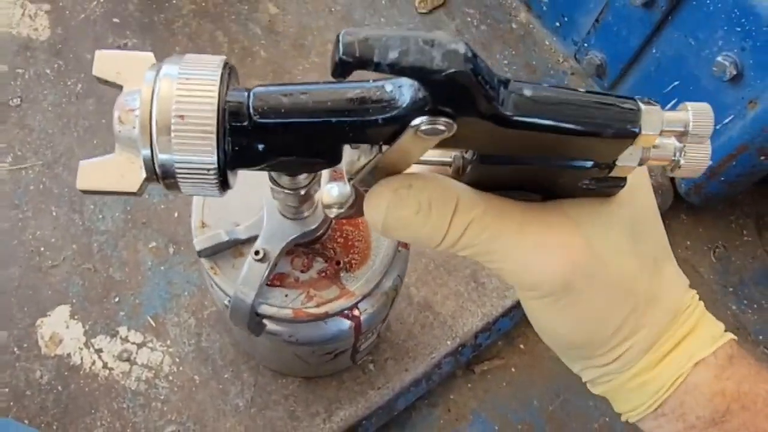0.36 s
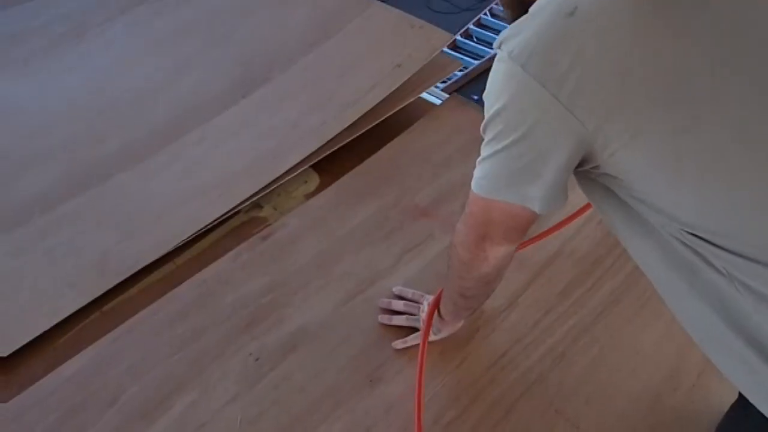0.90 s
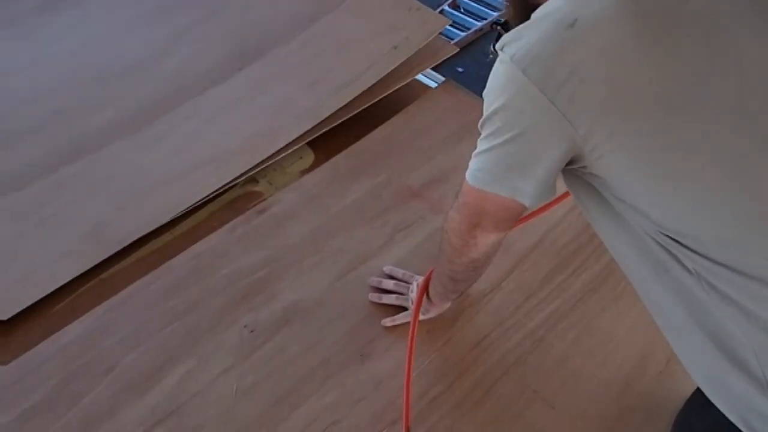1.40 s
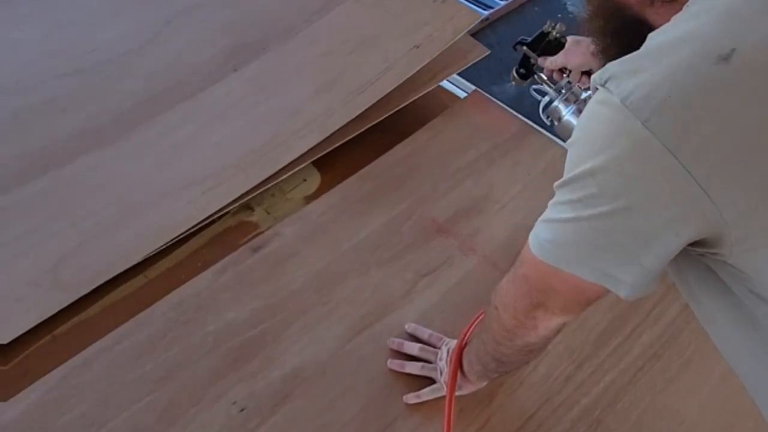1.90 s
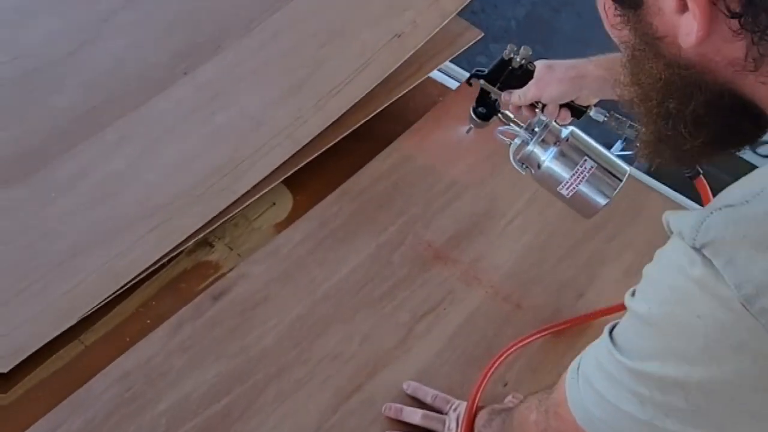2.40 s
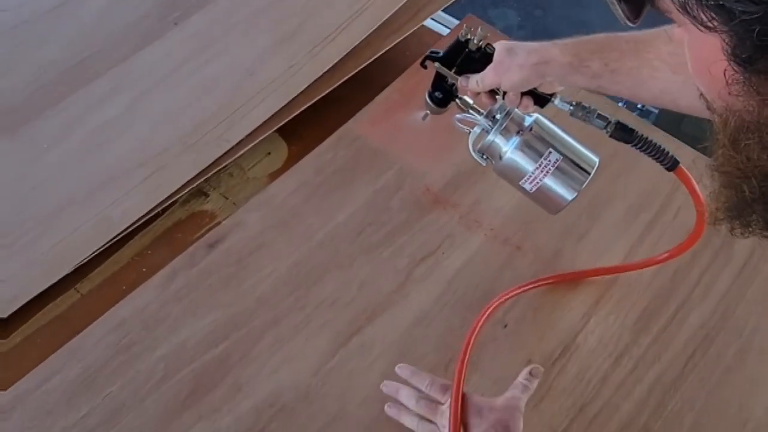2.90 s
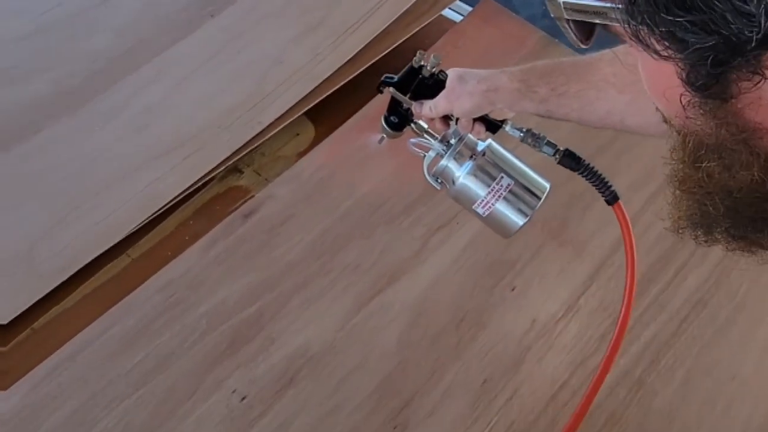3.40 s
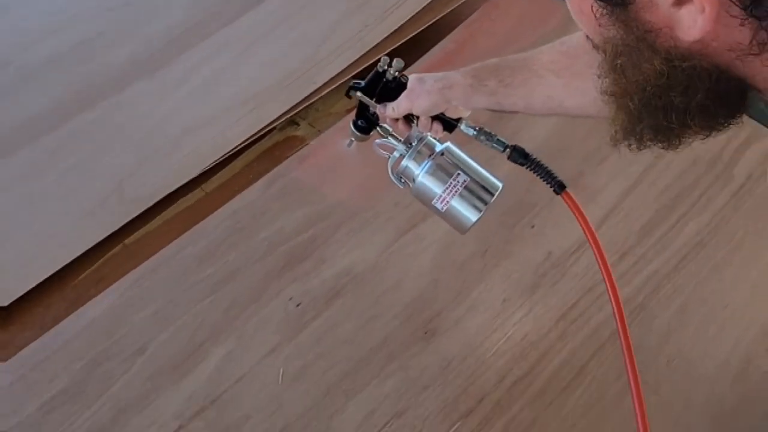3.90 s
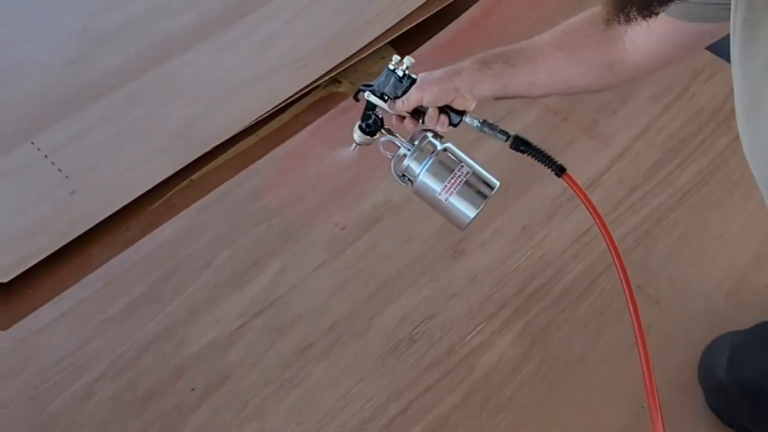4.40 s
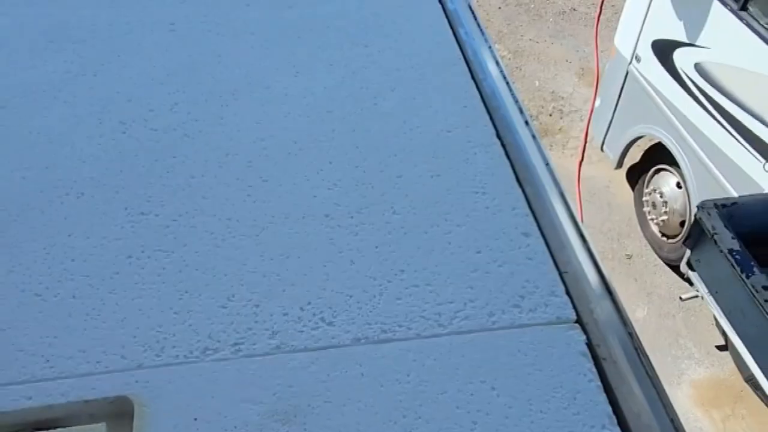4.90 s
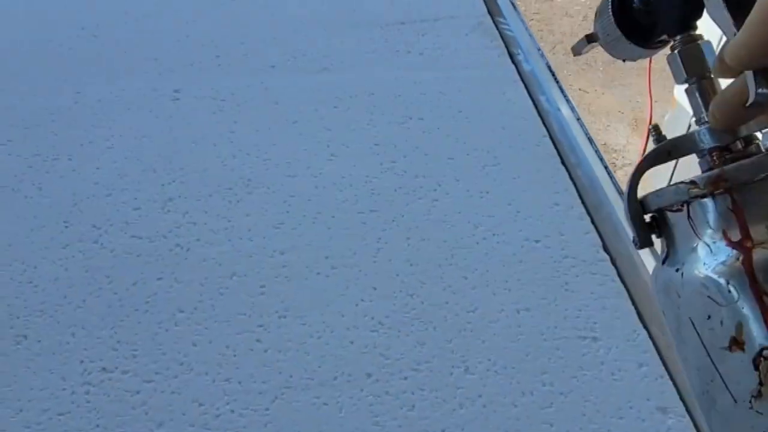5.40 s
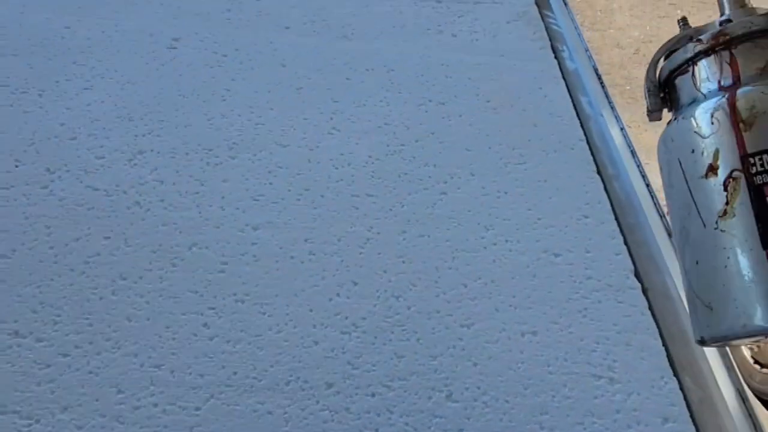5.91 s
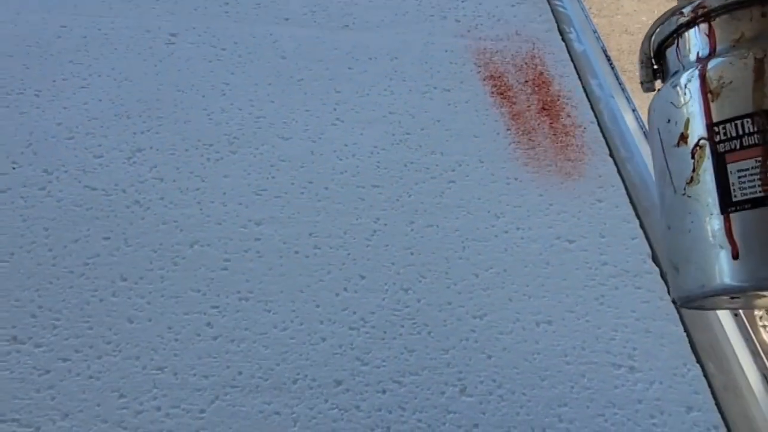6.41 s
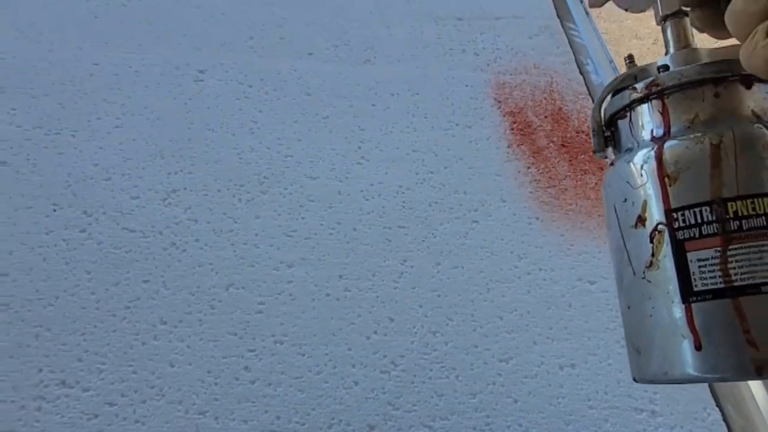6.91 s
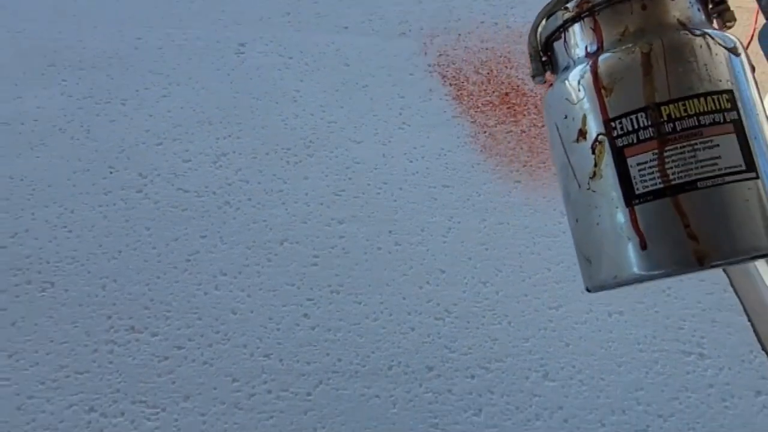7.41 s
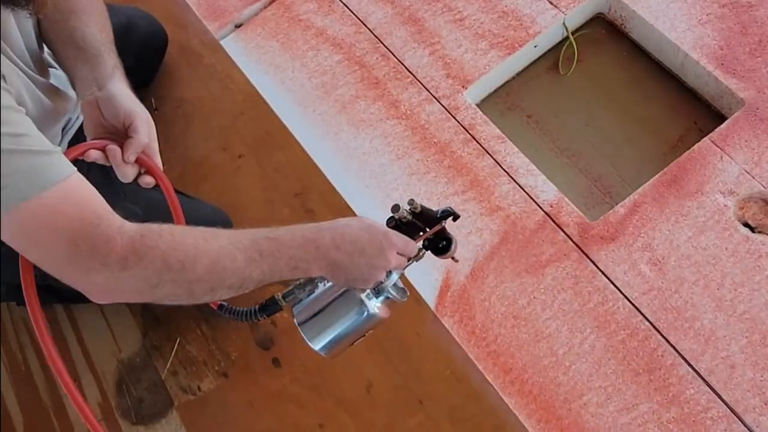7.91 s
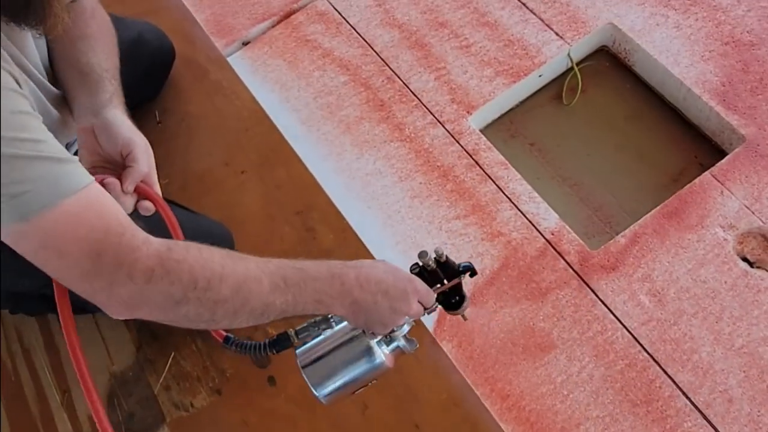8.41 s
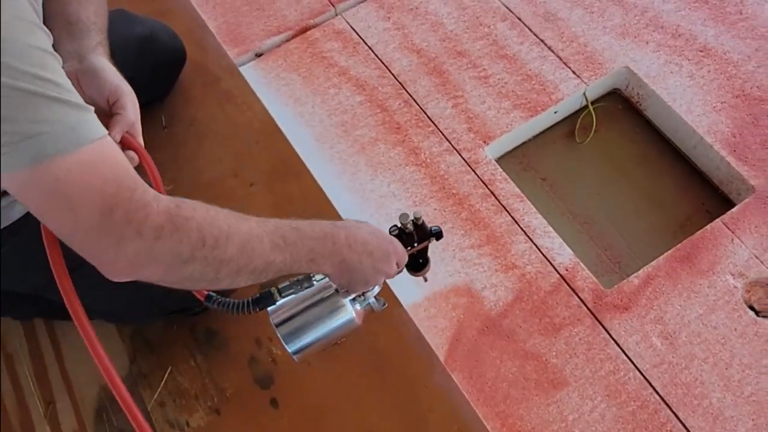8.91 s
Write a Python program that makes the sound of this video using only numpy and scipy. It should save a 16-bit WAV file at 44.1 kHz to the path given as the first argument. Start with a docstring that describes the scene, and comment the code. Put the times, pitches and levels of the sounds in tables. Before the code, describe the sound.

A spray gun is fiddled with, then blasts steady fizzing air in three close scenes, with faint compressor hum and finally a distant revving engine.

```python
"""A compressed-air spray gun: its jet fizzes at the air cap, then hisses and roars on the panel it hits.
Four short scenes: handling the gun close by, then blowing on plywood, on a roof, where glue joins the air,
and on foam. Two silent gaps part the first three; the last two melt into each other.
The jet is noise in narrow bands that swell and flicker; finger touches are noise bursts through resonances.
Sine waves make the humming compressor and a far-off engine that revs."""
import sys
import numpy as np
from scipy import signal
from scipy.fft import rfft, irfft, next_fast_len
from scipy.io import wavfile
from scipy.ndimage import uniform_filter1d

SR = 44100
rng = np.random.default_rng(int(sys.argv[2]) if len(sys.argv) > 2 else 0)


def volts_from_decibels(level):
    """Turn decibel levels (scalar or array-like) into linear amplitude factors."""
    exponent = np.asarray(level, float) / 20
    return 10 ** exponent


def put_to_file(sound):
    """Save the sound as 16-bit audio at rate SR, in the file named by the first command-line argument."""
    columns = np.atleast_2d(sound).T  # one column per channel
    safe = np.clip(columns, -1, 1)
    whole_steps = np.round(safe * 32767)
    wavfile.write(sys.argv[1], SR, whole_steps.astype(np.int16))


N = 399105
T = np.arange(N) / SR
STEP = 128  # samples between two points of a slow level curve


def walk(rate, count):
    """Slow random wander, spread near 1: random levels held 1 / rate samples and smoothed twice."""
    hold = max(int(1 / rate), 1)
    held = np.repeat(rng.standard_normal(count // hold + 1), hold)
    return 1.125 * uniform_filter1d(uniform_filter1d(held, hold), hold)[:count]


def spectrum(table, hz):
    """Read a table of (f/Hz, level/dB) points along a log-frequency axis."""
    f, db = np.transpose(table)
    return np.interp(np.log(hz), np.log(f), db)


def ring(x, modes):
    """Let x excite resonances (f/Hz, width/Hz, level/dB), as a struck body does, and add them up."""
    return sum(volts_from_decibels(db) * signal.lfilter(*signal.iirpeak(hz, hz / width, fs=SR), x) for hz, width, db in modes)


def span(t, start, end, edge):
    """A plateau from 0 up to 1 and back, with sloping edges centred on the two times."""
    return np.clip(np.minimum(t - start, end - t) / edge + .5, 0, 1)


# when each scene is heard: (start t/s, end t/s, fade-in/s)
# the last fade-in is a crossfade centred on the last start, and the last scene runs to the end
SHOTS = [(0, .603, .001), (.906, 4.802, .018), (4.999, 7.62, .001), (7.62, 9.06, .2)]


def shot_gains(t):
    """Gain of each scene in time; the last two cross over at equal power."""
    gains = [np.clip((t - start) / fade, 0, 1) * np.clip((end - t) / 0.0023, 0, 1) for start, end, fade in SHOTS]
    start, _, fade = SHOTS[3]
    late = np.clip((t - start) / fade + .5, 0, 1)
    gains[2] = np.clip((t - SHOTS[2][0]) / SHOTS[2][2], 0, 1) * np.sqrt(1 - late)
    gains[3] = np.sqrt(late)
    return np.array(gains)


# how the engine revs: (t/s, base cycle f/Hz, level/dB)
ENGINE = [(7.6, 14.9, -48), (7.7, 16.5, -47.5), (7.85, 17.5, -43), (8.0, 18.1, -41), (8.15, 18, -38),
          (8.36, 18.3, -43.5), (8.6, 17.0, -45), (8.8, 19, -39.5), (9.04, 19.2, -40)]
# strength of its overtones: (multiple of the base cycle, level/dB relative to the engine level)
ORDERS_DB = [(3, -9), (4, 0), (5, 0), (7, -8), (9, -9), (10, -5)]


def engine():
    """Low multiples of an engine's cycle, each wavering in level while the engine revs up and down."""
    t, hz, db = np.transpose(ENGINE)
    phase = 2 * np.pi * np.cumsum(np.interp(T, t, hz)) / SR
    orders = sum(volts_from_decibels(rel_db + 2.2 * walk(6 / SR, N)) * np.sin(k * phase + k) for k, rel_db in ORDERS_DB)
    return np.sqrt(2) * volts_from_decibels(np.interp(T, t, db)) * orders


# hum tones: (multiple of the shaft speed, level/dB over plywood, level/dB on the roof), before the swell
COMPRESSOR = [(2, -57, -50), (3, -49, -55), (4, -53, -64), (6, -56, -50)]
# the hum swells and sinks: (t/s, change of level/dB)
HUM_SWELL = [(.9, -8), (2.5, -4), (3.5, 0), (4.8, 2), (5.0, -2), (5.4, 3), (5.85, 3), (5.95, -1), (6.6, 0),
             (7.6, -3)]
SHAFT_HZ = 28.82


def compressor(gains):
    """Hum at multiples of the shaft speed, wavering a little in pitch and level."""
    phase = 2 * np.pi * np.cumsum(SHAFT_HZ * (1 + 0.00355 * walk(2.5 / SR, N))) / SR
    swell_db = np.interp(T, *np.transpose(HUM_SWELL))
    hum = np.zeros(N)
    for k, plywood_db, roof_db in COMPRESSOR:
        level = volts_from_decibels(plywood_db) * gains[1] + volts_from_decibels(roof_db) * gains[2]
        wobble = volts_from_decibels(swell_db + 1.5 * walk(4 / SR, N))
        hum += level * wobble * np.sqrt(2) * np.sin(k * phase + k)
    return hum


# fingers on trigger and cup: (t/s, tick drive level/dB, knock drive level/dB, tick brightness 0-1)
TOUCHES = [(0.035, -42, -18, 0.3), (0.07, -21.5, -18.5, 0.5), (0.079, -14.5, -46, 0.43),
           (0.103, -17.5, -31, 0.45), (0.1336, -33, -10, 0.5), (0.1605, -27, -14.5, 0.4),
           (0.243, -32.5, -22.5, 0.2), (0.29, -36, -21.5, 0.5), (0.312, -36, -28.5, 0.63),
           (0.352, -39.5, -35, 0.46), (0.52, -43, -40.5, 0.5), (0.5785, -14, -26.5, 0.38)]
# resonances of the gun body: (f/Hz, width/Hz, level/dB)
GUN = [(70, 30, 3), (277, 45, 12.5), (350, 49, -9), (560, 86, -3), (737, 56, 0), (1200, 120, -25),
       (1370, 110, -24)]
# resonances of a tick: (f/Hz, width/Hz, level/dB when dull, level/dB when bright)
TICK = [(2200, 760, -7.5, -29), (4160, 1050, -12, 25.5), (8000, 4000, -43, -25.5),
        (13500, 4000, -19.5, -19)]
# faint tone of the cup: (start t/s, f/Hz, level/dB)
CUP_RING = (.33, 1162, -63)
TICK_S, KNOCK_S = 0.0034, 0.0095  # fading times of the noise bursts


def touches():
    """Each touch is a scratchy tick plus a dull knock through the gun body; the cup adds a faint steady tone."""
    out = np.zeros((2, N))
    t = T[:int(.12 * SR)]
    for at, tick_db, knock_db, bright in TOUCHES:
        burst = rng.standard_normal((3, len(t)))
        bright = np.clip(bright, 0, 1)
        modes = [(hz, width, dull_db + bright * (bright_db - dull_db)) for hz, width, dull_db, bright_db in TICK]
        scratch = np.diff(burst[:2], prepend=0) * np.exp(-t / TICK_S)  # differs left and right
        tick = ring(scratch, modes)
        knock = ring(burst[2] * np.exp(-t / KNOCK_S), GUN)
        i = int(at * SR)
        out[:, i:i + len(t)] += volts_from_decibels(tick_db) * tick + volts_from_decibels(knock_db) * knock
    start, hz, db = CUP_RING
    return out + volts_from_decibels(db) * np.clip((T - start) / .03, 0, 1) * np.sqrt(2) * np.sin(2 * np.pi * hz * T)


PUFF_S, PUFF_HZ = 1.196, (450, 3260)  # start, pass band
PUFF_DB, PUFF_SAG_DB_PER_S = -32, 110


def puff():
    """A short dull breath of air as the valve cracks open before the second pull: fading band-passed noise."""
    age = np.maximum(T - PUFF_S, 0)
    band = signal.butter(4, PUFF_HZ, "band", fs=SR, output="sos")
    mid, side = signal.sosfilt(band, rng.standard_normal((2, N)))
    shape = np.minimum(age / .006, 1) * volts_from_decibels(PUFF_DB - PUFF_SAG_DB_PER_S * age) / np.std(mid)
    return shape * np.array([mid + side, mid - side])


# slow level of the bass: (t/s, rumble level/dB, drumming level/dB)
RUMBLE = [(0.0, -47, -40), (0.166, -33, -35.5), (0.222, -41, -36), (0.3, -36, -35), (0.526, -46.5, -52),
          (0.6, -49.5, -52), (0.951, -55.5, -42.5), (1.06, -55, -54), (1.31, -47.5, -43), (1.9, -51.5, -49),
          (2.1, -41.5, -48), (4.79, -45, -45.5), (5.01, -43, -45.5), (5.86, -44.5, -47), (5.93, -50.5, -51),
          (7.3, -50, -48.5), (7.68, -48, -52.5), (8.08, -40, -42.5), (8.16, -42, -52), (8.3, -42, -50),
          (8.5, -38, -47.5), (9.04, -44, -45)]
# dull thuds, perhaps the hose or the breeze: (t/s, length/s, rumble level/dB, drumming level/dB)
THUDS = [(2.07, 0.092, -44, -58), (2.594, 0.088, -37, -60), (3.676, 0.063, -51, -36),
         (5.348, 0.11, -35.5, -66), (6.138, 0.018, -35, -42)]
GUST_DB, GUSTS_PER_S = 2, 11  # the bass flutters in the breeze
# the jet blows under a loose sheet, which drums: (start, end) in s, drumming dB, extra roar dB
SHEET_S, SHEET_DB, SHEET_ROAR_DB = (1.236, 1.9), -41.5, 5.5


def bass_levels(t):
    """Rumble and drumming in dB: a slow level that flutters, with thuds and the drumming sheet added as power."""
    s, *rows = np.transpose(RUMBLE)
    flutter = [np.interp(t, s, db) + GUST_DB * walk(GUSTS_PER_S * STEP / SR, len(t)) for db in rows]
    power = volts_from_decibels(2 * np.array(flutter))
    for at, length, rumble_db, drum_db in THUDS:
        bump = np.exp(-(2 * (t - at) / length) ** 2)
        power = power + np.outer(volts_from_decibels(2 * np.array([rumble_db, drum_db])), bump)
    sheet = volts_from_decibels(2 * SHEET_DB) * span(t, *SHEET_S, 0.072) ** 2
    return 10 * np.log10(power + np.outer([0, 1], sheet))


# the jet as the gun moves: (t/s, hiss on the panel level/dB, air cap level/dB)
JET = [(1.321, -30, -20.5), (1.66, -32.5, -21.5), (1.92, -27.5, -24), (2.23, -26.5, -22), (2.72, -27, -21),
       (3.3, -27.5, -22), (3.46, -28.5, -23), (4.1, -28, -22.5), (4.55, -26.5, -23), (4.79, -26, -20.5),
       (5.0, -24.5, -27.5), (5.5, -24.5, -26), (5.9, -25, -26.5), (6.75, -22.5, -25.5), (7.06, -23, -22),
       (7.22, -22, -22.5), (7.5, -23, -25), (7.75, -25, -26), (7.93, -21.5, -23), (8.08, -20, -23.5),
       (8.4, -22.5, -22), (8.519, -21.5, -24), (9.04, -19.5, -22)]
# rows plywood, roof, foam: (roar minus panel hiss/dB, fan air minus cap/dB, fizz minus cap/dB)
JET_PARTS = [(-12, -6.5, -2), (-17, -7, -1.5), (-18.5, -7.5, -3.7)]
# rustle of glove and yard: (t/s, roar level/dB, hiss level/dB, fan air level/dB, fizz level/dB)
RUSTLE = [(0, -45.5, -53.5, -69, -71), (.16, -45, -54, -77, -71), (.3, -48, -67.5, -75, -77),
          (.4, -57, -63, -72, -84), (.6, -57, -64, -83.5, -82.5)]
# trigger: (pulled t/s, let go t/s, surge of stored air/dB before its share); the second pull lasts to the end
PULLS = [(0.91, 1.06, 15), (1.26, 9.1, 1)]
# share of the surge, no unit: (roar, hiss, fan air, fizz)
SURGE_SHARE = (1.94, 1.14, .1, .3)
# dying away after letting go, dB per s: (roar, hiss, fan air, fizz)
RELEASE_DB_PER_S = (90, 190, 198, 250)
# spurts of glue brighten the fizz at once, then thin out: (t/s, extra fizz level/dB, fading time/s)
SPURTS = [(5.88, 8, 0.61), (7.24, 2.5, .25)]
# the jet swings off the panel, rows start and end: change of (roar, hiss, fan air, fizz) level/dB
SWING_DB = [(-3.5, -0.5, 7.7, 3), (-11.5, -6, 2.5, 3)]
SWING_S = (8.11, 8.33)  # start, end
PULL_S, SURGE_S = 0.03, 0.038  # rise of the jet, fading time of the surge
SPURT_FAN_SHARE = 0.26  # part of a spurt's dB that the fan air gets


def jet_levels(t, share):
    """Roar, hiss, fan air and fizz in dB: the trigger lets stored air surge out; rustle lies underneath."""
    s, panel_db, cap_db = np.transpose(JET)
    panel, cap = np.interp(t, s, panel_db), np.interp(t, s, cap_db)
    roar, fan, fizz = np.transpose(JET_PARTS) @ share[1:]
    spurt = sum(db * (t > at) * np.exp(-np.abs(t - at) / fade) for at, db, fade in SPURTS)
    steady = np.array([panel + roar + SHEET_ROAR_DB * span(t, *SHEET_S, 0.18),
                       panel,
                       cap + fan + SPURT_FAN_SHARE * spurt,
                       cap + fizz + spurt])
    swing = np.array([np.interp(t, SWING_S, db) for db in np.transpose(SWING_DB)])
    steady = steady + span(t, *SWING_S, 0.023) * swing
    s, *rustle = np.transpose(RUSTLE)
    power = volts_from_decibels(2 * np.array([np.interp(t, s, db) for db in rustle]))
    for pulled, released, surge_db in PULLS:
        age = np.maximum(t - pulled, 0)
        surge = np.outer(SURGE_SHARE, surge_db * np.exp(-age / SURGE_S))
        release = np.outer(RELEASE_DB_PER_S, np.maximum(t - released, 0))
        power = power + (np.minimum(age / PULL_S, 1) * volts_from_decibels(steady + surge - release)) ** 2
    return 10 * np.log10(power)


# colour below and above SPLIT_HZ, one list per scene: (f/Hz, level/dB per Hz); only the shape counts
LOWS = [
    [(18, -30), (35, -9.5), (70, 2.5), (150, -15), (300, -12.5), (450, -24.5), (800, -30)],
    [(18, -40), (30, -10), (60, 3), (91, 6), (310, -11), (356, -11), (419, -14.5), (800, -17.5),
     (1040, -42), (1760, -120)],
    [(18, -25), (35, -4), (65, 16), (125, -0.5), (170, 1.5), (230, -7.5), (450, -14.5), (800, -20)],
    [(18, -40), (30, -20), (81, 2), (129, -13.5), (184, -3.5), (468, -12), (800, -16), (1040, -48),
     (1760, -120)],
]
HIGHS = [
    [(600, 0.5), (1500, -13.5), (4000, -22), (8000, -31), (15300, -39)],
    [(350, -49), (600, -21.5), (735, -11.5), (901, -17), (1590, -17), (1980, -10.5), (2420, -9.5),
     (3540, -2.5), (6690, 2), (8310, -0.5), (11800, 5.5), (14500, 17.5), (15300, 17)],
    [(350, -50), (600, -15), (877, -20), (1050, -22.5), (2120, -17.5), (2700, -13), (4050, -9), (4640, -14),
     (5610, -6), (8310, 2.5), (11100, 4.5), (14300, 13), (15300, 14.5)],
    [(350, -52), (600, -22), (660, -5.5), (879, -5.5), (1090, -11), (1360, -8), (1860, -10.5), (2350, -7),
     (3000, -8), (4270, -4.5), (8450, 9.5), (15600, 20.5)],
]
SPLIT_HZ = 700


def colour(shot, hz):
    """Tone colour of one scene: two spectra joined at 0 dB where the jet takes over from the rumble."""
    low, high = (spectrum(table, hz) - spectrum(table, SPLIT_HZ) for table in (LOWS[shot], HIGHS[shot]))
    return np.where(hz < SPLIT_HZ, low, high)


# path from nozzle to the two ports: (t/s, lead of the left/microseconds, share of direct sound, capped at 0.5)
DIRECT = [(1.7, 39, 0), (2.1, 35, 0.34), (3.2, 25, 0.68), (4.0, -22, 0.55), (4.8, -21, 0.45),
          (5.0, 167, 0.13), (5.8, 188, 0.03), (5.95, 190, 0.33), (6.55, 224, 0.37), (7.3, 193, 0.34),
          (7.6, 170, 0), (7.7, -8, 0.34), (8.35, 115, 0.6), (9.05, 62, 0.4)]
# where the gun is: (t/s, left minus right level/dB)
PAN = [(0.0, -1), (0.3, -1), (0.5, -1.5), (1.26, 0), (1.91, 1.0), (2.69, -0.5), (3.62, -1), (3.83, -1),
       (7.55, 0.5), (7.93, 2), (9.04, 2)]


def ports(mid, side, direct):
    """Scattered sound differs at the two ports; the direct jet reaches one a little before the other."""
    s, lead_us, share = np.transpose(DIRECT)
    lead = np.interp(T, s, lead_us) * SR / 2e6  # samples, half of the lead for each port
    share = np.clip(np.interp(T, s, share), 0, .5)
    pan = volts_from_decibels(np.interp(T, *np.transpose(PAN)) / 2)
    fine = signal.resample_poly(direct, 4, 1)  # finer time grid for the tiny shifts
    left, right = (np.interp(4 * (np.arange(N) + sign * lead), np.arange(4 * N), fine) for sign in (1, -1))
    near, far = np.sqrt(2 * share), np.sqrt(1 - share)
    return np.array([(far * (mid + side) + near * left) * pan, (far * (mid - side) + near * right) / pan])


# yard rumble, panel drumming, roar on the panel, jet hiss, fan air, cap fizz: (low f/Hz, high f/Hz)
PARTS = [(35, 200), (200, 600), (600, 2200), (2200, 7500), (7500, 12000), (12000, 15600)]
# stereo width: (f/Hz, side minus mid level/dB)
SIDE_DB = [(60, -7), (110, -12), (200, -8.5), (380, -0.5), (700, 2.5), (1290, 4), (2380, 1.5), (4400, 1),
           (8120, 2), (15000, -1)]
GLUE_S = (5.88, 7.55)  # glue enters the jet: start, end
GLUE_SPUTTER_DB, DRY_SPUTTER_DB = 1.2, .9  # extra with glue, always there; both before the weight by pitch


def air(count=48):
    """Turbulent noise in bands coloured by scene: all waver together in gusts, and each also flickers on its own."""
    t = T[::STEP]
    edges = 200 * np.expm1(np.linspace(np.log1p(15 / 200), np.log1p(16800 / 200), count + 2))
    centres, widths = edges[1:-1], (edges[2:] - edges[:-2]) / 2
    share = shot_gains(t) ** 2 + 1e-9
    share = share / share.sum(axis=0)
    power = np.array([widths * volts_from_decibels(2 * colour(shot, centres)) for shot in range(len(LOWS))]).T @ share
    levels = [*bass_levels(t), *jet_levels(t, share)]
    # lift each part from the power its colour gives to the level wanted
    parts = np.array([db - 10 * np.log10(power[(centres >= lo) & (centres < hi)].sum(axis=0))
                      for (lo, hi), db in zip(PARTS, levels)])
    # two points per part, so that neighbours blend between them
    middles = np.log([lo * (hi / lo) ** np.array([.4, .6]) for lo, hi in PARTS]).ravel()
    size = next_fast_len(N)
    hz = np.arange(size // 2 + 1) * SR / size
    noise = rfft(rng.standard_normal((3, size)))  # mid, side, direct
    # droplets tearing off shake the whole top of the jet at once
    sputter = (DRY_SPUTTER_DB + GLUE_SPUTTER_DB * span(T, *GLUE_S, .05)) * walk(260 / SR, N)
    gust = walk(5 * STEP / SR, len(t))
    out = np.zeros((3, N))
    for k, f in enumerate(centres):
        window = np.sqrt(np.interp(hz, edges[k:k + 3], [0, 1, 0]) * SR / 2 / widths[k])
        blend = np.array([np.interp(np.log(f), middles, np.repeat(row, 2)) for row in np.eye(len(PARTS))])
        waver = 0.51 * gust + 1.4 * walk(9 * STEP / SR, len(t))  # shared gust, own flicker
        db = 10 * np.log10(power[k]) + blend @ parts + waver
        gain = np.interp(T, t, volts_from_decibels(db)) * volts_from_decibels(sputter * min(f / 23000.0, 1))
        band = irfft(noise * window, size)[:, :N]
        out += gain * band * [[1], [volts_from_decibels(spectrum(SIDE_DB, f))], [min(f / 1460.0, 1)]]
    return ports(*out)


# top of the air noise before and after the last crossfade: (f/Hz, f/Hz)
TOPS_HZ = [15490, 15760]


def scene():
    """Air noise runs through all scenes under a steep treble limit; the other sources come and go."""
    gains, noise = shot_gains(T), air()
    heard = np.sqrt((gains ** 2).sum(axis=0))
    early_air, late_air = [signal.sosfilt(signal.ellip(12, .3, 70, hz, fs=SR, output="sos"), noise)
                           for hz in TOPS_HZ]
    late = gains[3] ** 2
    jet = heard * (early_air * (1 - late) + late_air * late)
    return jet + gains[0] * touches() + compressor(gains) + gains[3] * engine() + puff()


def low_pass(x):
    """Removes everything above the highest recorded frequency."""
    return signal.sosfilt(signal.butter(12, 16660, fs=SR, output="sos"), x)


def record(dry):
    """Take the finished mix to its final form."""
    return low_pass(dry)


dry = scene()
out = record(dry)
put_to_file(out)
```